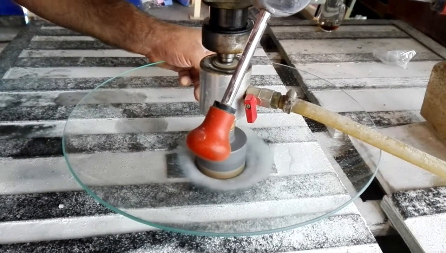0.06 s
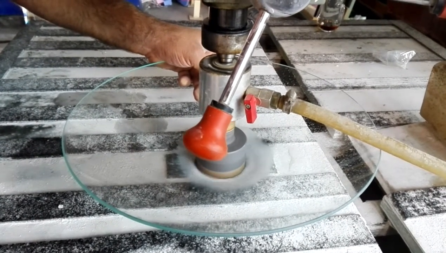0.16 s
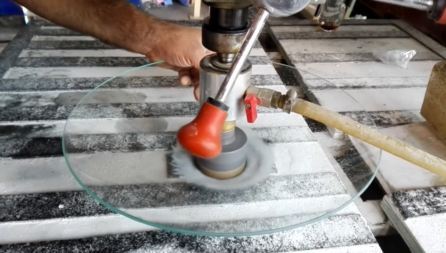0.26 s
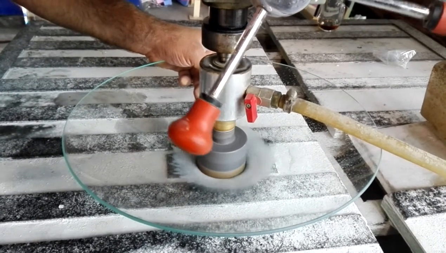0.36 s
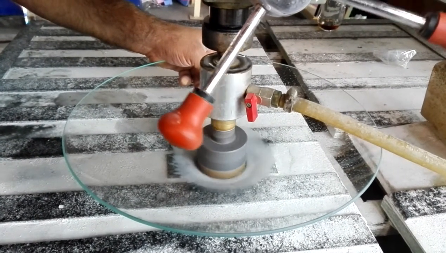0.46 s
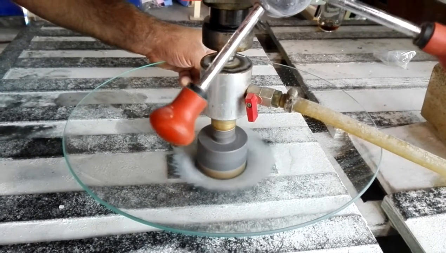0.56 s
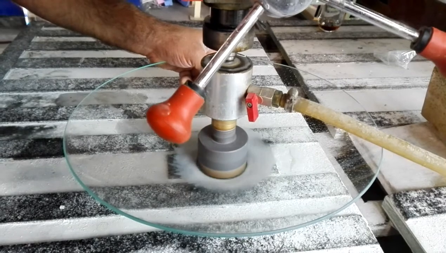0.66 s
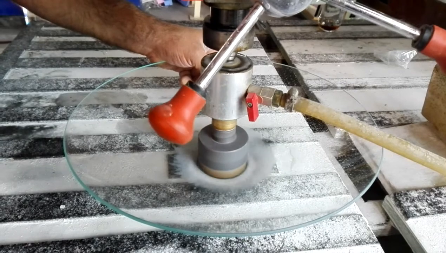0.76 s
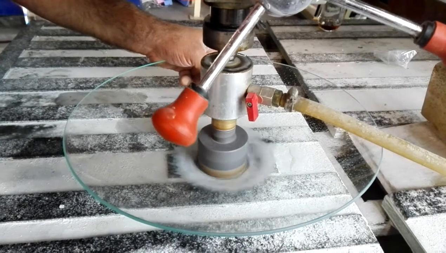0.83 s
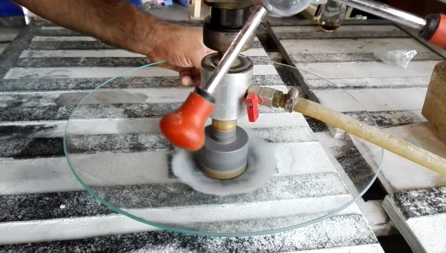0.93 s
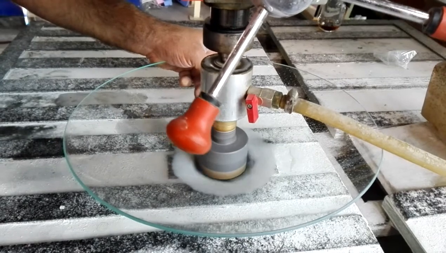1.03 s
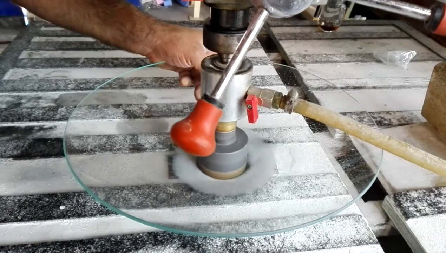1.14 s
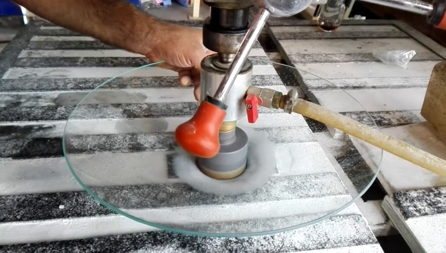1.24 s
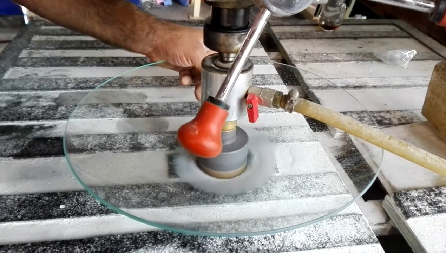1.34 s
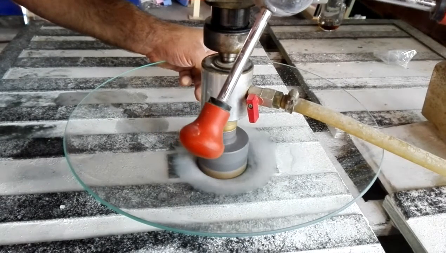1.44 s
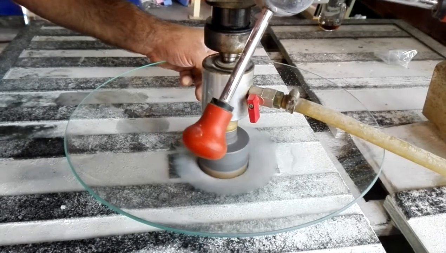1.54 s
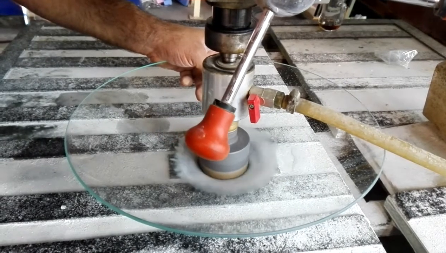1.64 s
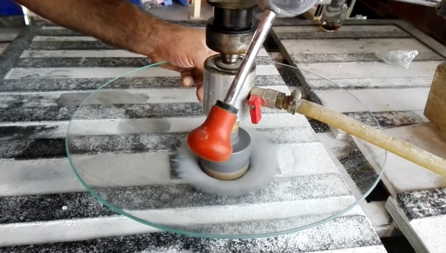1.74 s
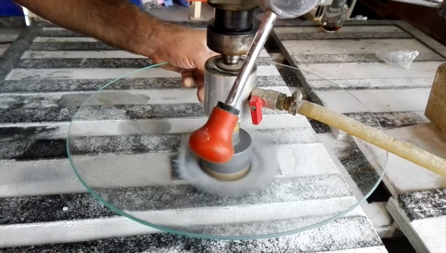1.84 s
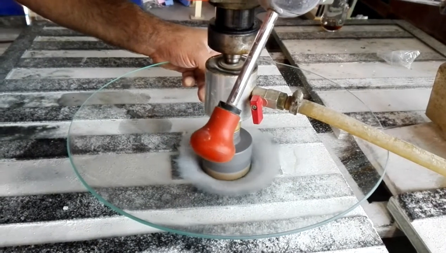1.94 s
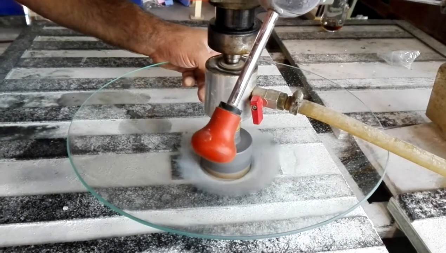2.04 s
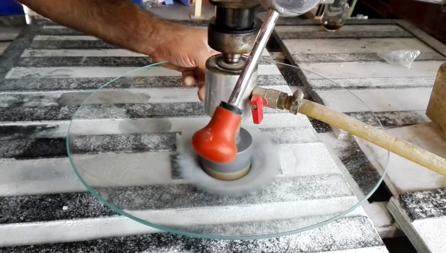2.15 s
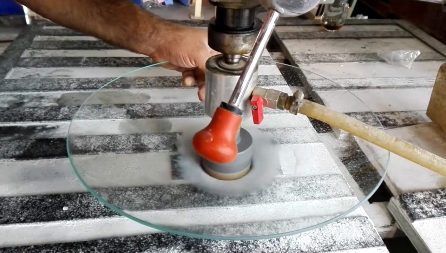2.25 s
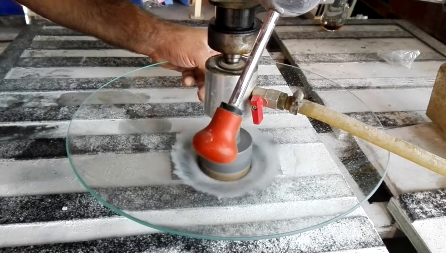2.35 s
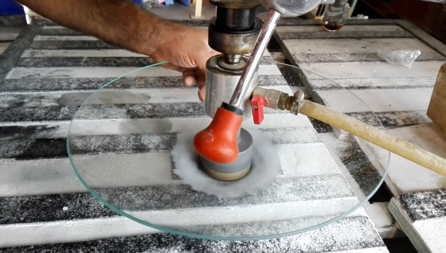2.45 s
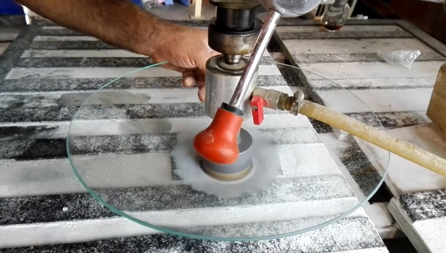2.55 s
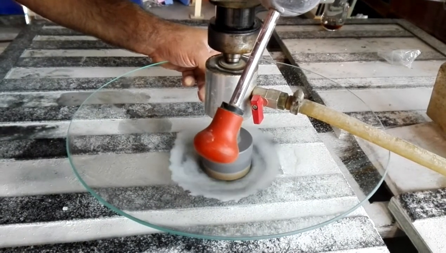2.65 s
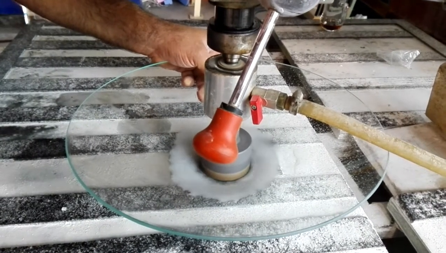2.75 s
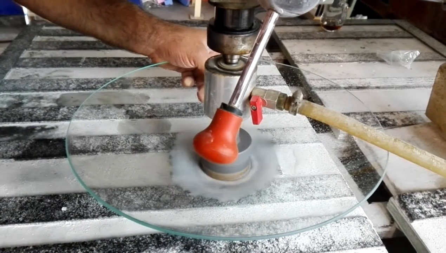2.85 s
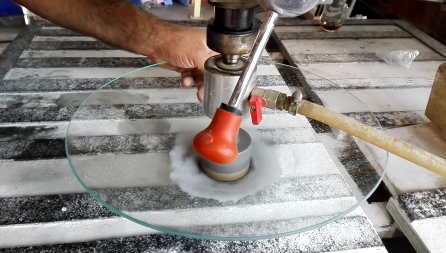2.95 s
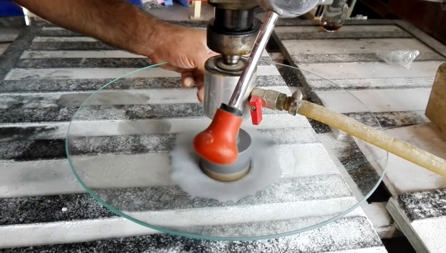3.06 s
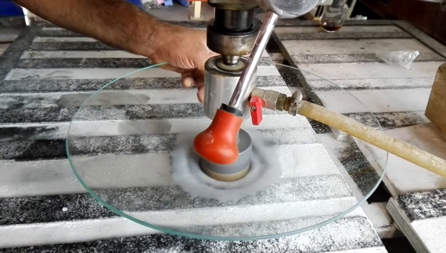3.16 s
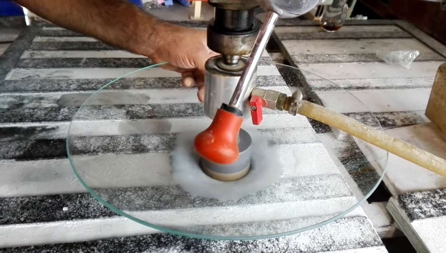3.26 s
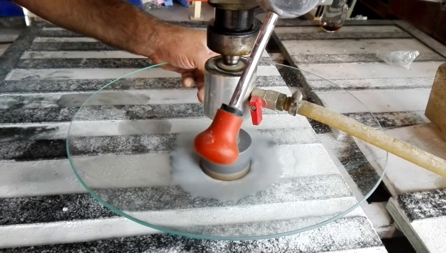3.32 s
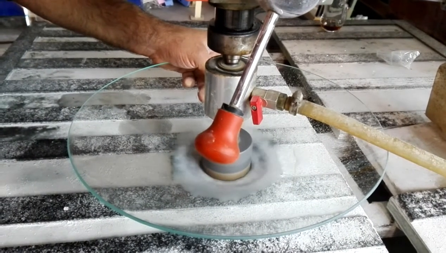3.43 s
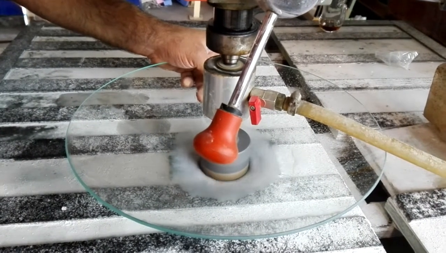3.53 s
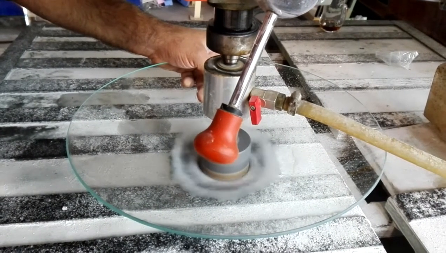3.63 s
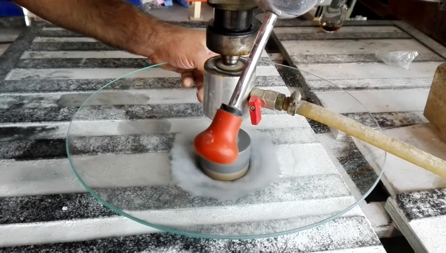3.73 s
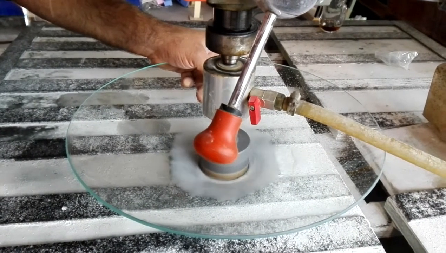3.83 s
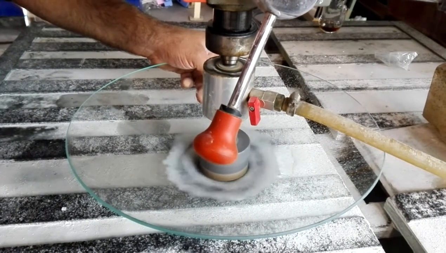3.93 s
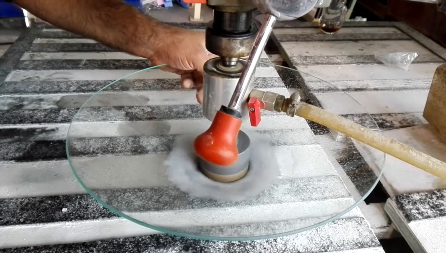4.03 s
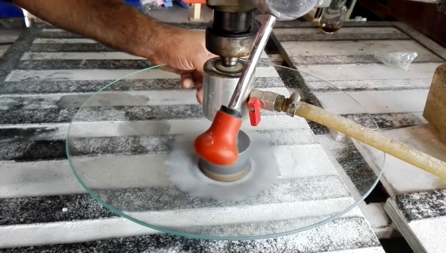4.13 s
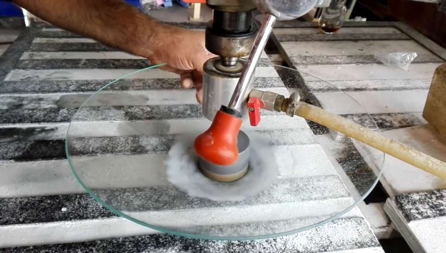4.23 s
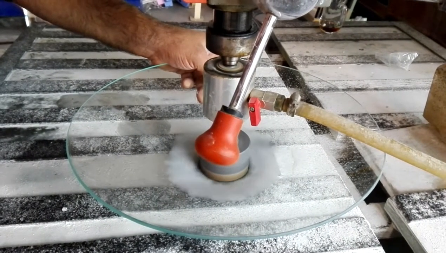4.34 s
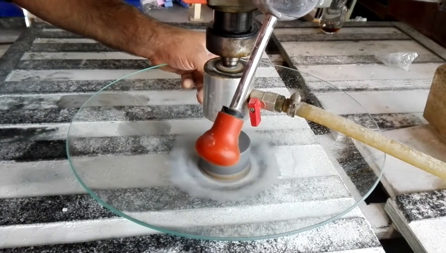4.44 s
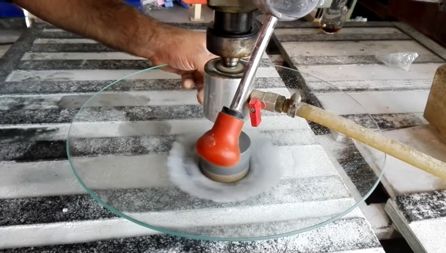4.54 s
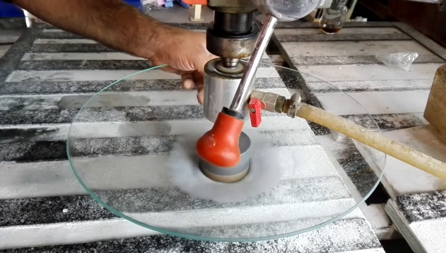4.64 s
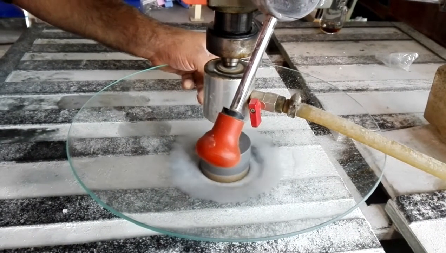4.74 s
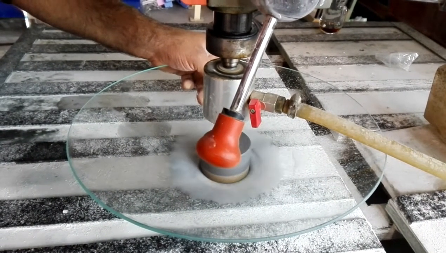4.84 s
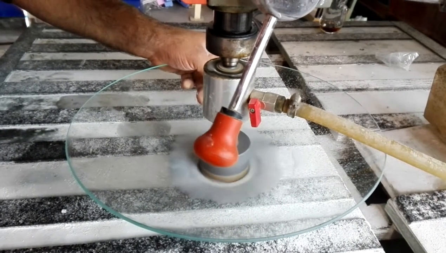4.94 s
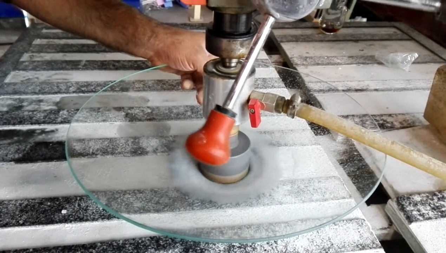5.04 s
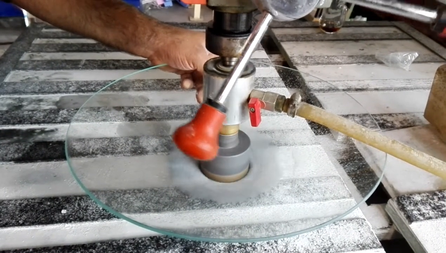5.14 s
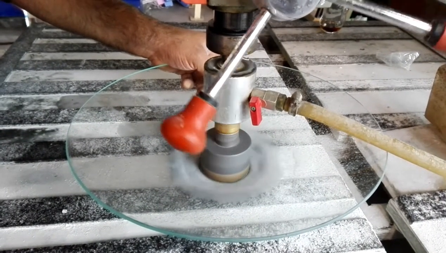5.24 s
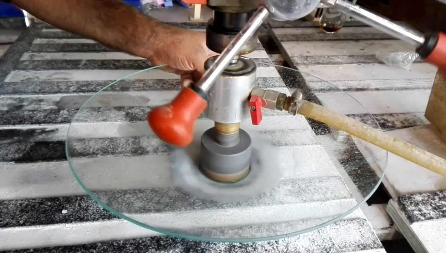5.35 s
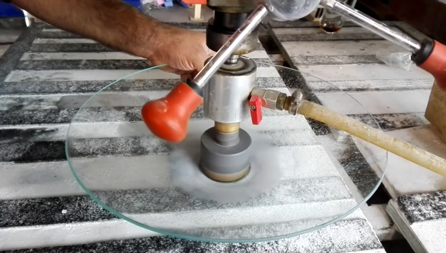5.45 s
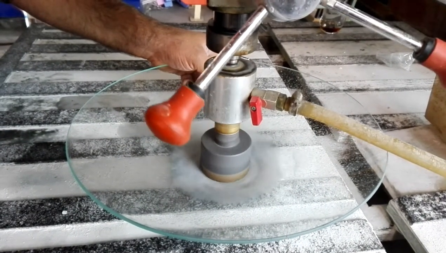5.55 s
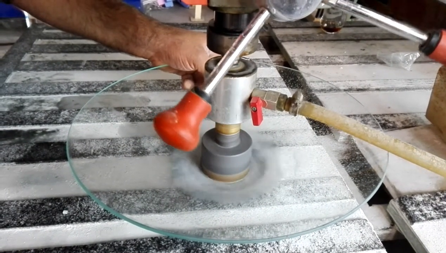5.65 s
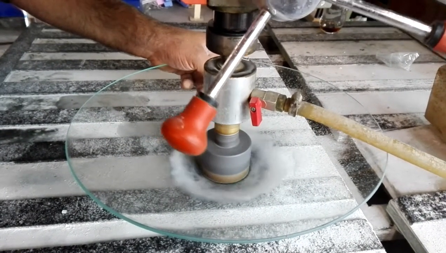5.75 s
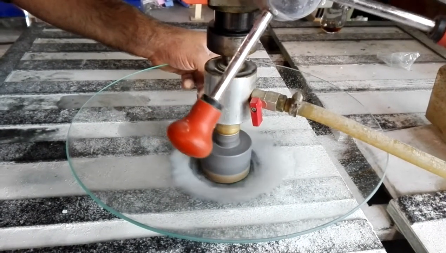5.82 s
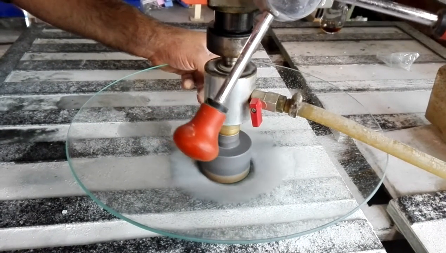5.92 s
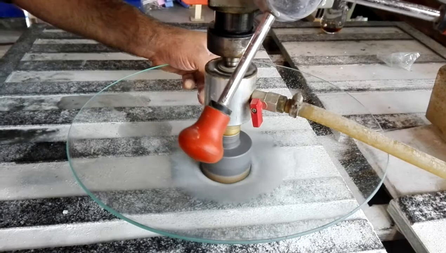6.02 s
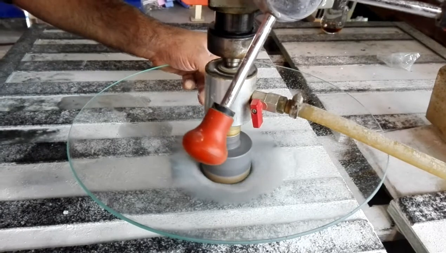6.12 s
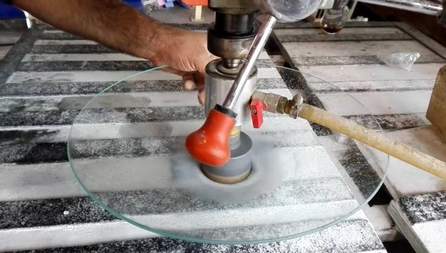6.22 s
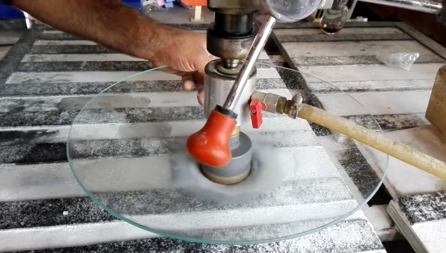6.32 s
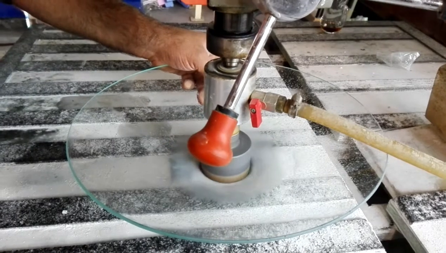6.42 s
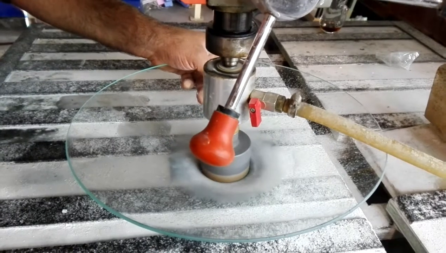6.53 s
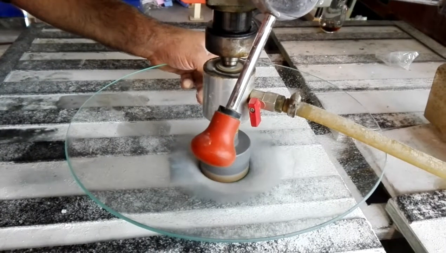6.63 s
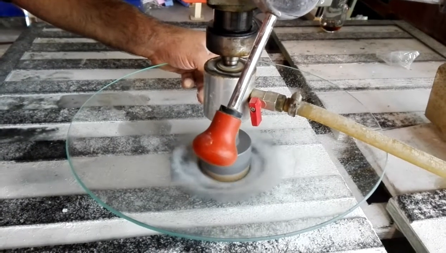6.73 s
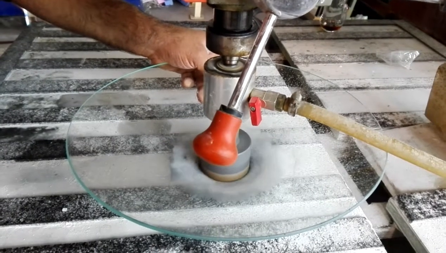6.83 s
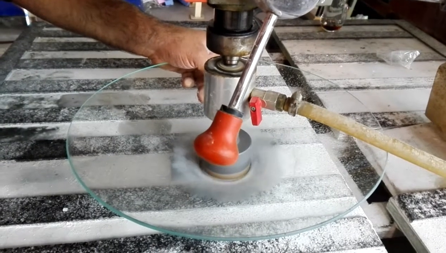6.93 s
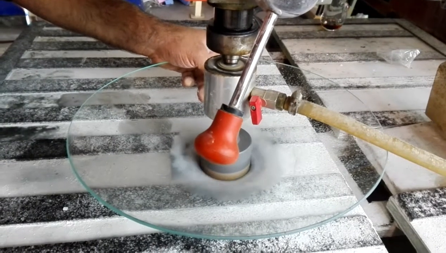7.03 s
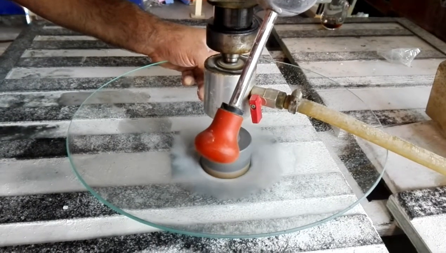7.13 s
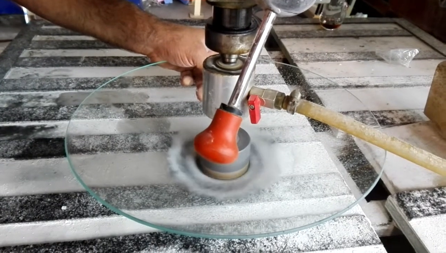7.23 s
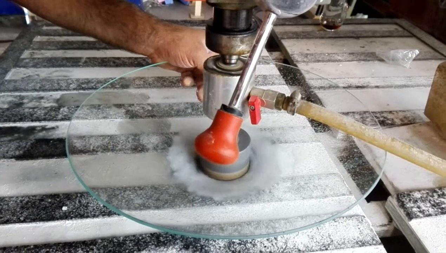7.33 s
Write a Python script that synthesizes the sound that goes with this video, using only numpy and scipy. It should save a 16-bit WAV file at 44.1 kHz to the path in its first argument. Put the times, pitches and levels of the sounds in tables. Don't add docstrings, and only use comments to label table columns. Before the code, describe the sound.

A drill motor and gears run constantly, a low rumble with a mid-high whirr, heard close on a phone in a lightly echoing workshop. At 0 s the bit is already squealing on glass; it stutters and lifts by 0.45 s, leaving motor, loose rattle and knocks at about 0.5 and 0.8 s. Scraping grazes at 0.97-1.05 s bring it down again. Gritty hiss and a rough squeal around 6 kHz set in, with groans at 1.3 and 1.65 s and a table hum building. From about 2.4 s a faint steady pump tone joins; from 2.5 to 5 s the screech is narrower and piercing, surging and throbbing rapidly, with a whistle swelling near 5 s. It lifts at 5.25 s, with a knock at 5.35 s. Broken rasps from 5.83 s become rougher, duller grinding after 6.2 s, continuing to the end.

```python
import sys
import numpy as np
from scipy import signal
from scipy.fft import irfft
from scipy.io import wavfile
from scipy.ndimage import uniform_filter1d

SR = 44100
rng = np.random.default_rng(int(sys.argv[2]) if len(sys.argv) > 2 else 0)


def pcm_store(signal):
    levels = np.round(np.clip(np.atleast_2d(signal), -1, 1) * 32767)
    wavfile.write(sys.argv[1], SR, levels.astype(np.int16).T)


def voltage_ratio(decibels):
    exponent = np.asarray(decibels, float) / 20
    return 10 ** exponent


N = 325443
T = np.arange(N) / SR

TURNS_PER_S, HIGH_SPOT_S = 42.35, 5.026
BRUSH_DB, BRUSH_HZ = -37.5, 5250

# pitch_hz, level_db (per Hz)
RUMBLE = [(21, -34), (36, 9), (70, -13), (103, -6.5), (130, -3), (286, -7.5), (347, -13), (421, -17),
          (548, -16), (665, -7), (727, -12), (766, -7.5), (1110, -10), (1250, -7.5), (2400, -12),
          (3120, -48), (5280, -120)]
# pitch_hz, level_db (per Hz)
WHIRR = [(1410, -15), (2400, -33), (2630, -10), (3100, -9.5), (3490, -1), (4000, -4), (4510, -4.5),
         (5900, -20), (8460, -12), (9610, -21), (11200, -21), (12600, -35), (14400, -34)]
# pitch_hz, width_hz, level_db
CASING = [(2650, 60, -17), (3730, 130, -2), (6350, 680, -15.5), (7760, 160, -12), (8500, 250, -8.5),
          (11050, 400, -12.5), (12600, 1300, -27), (14100, 500, -28)]
# pitch_hz, width_hz, level_db
HUM = [(43.5, 11, -61), (101.5, 16, -56.5), (148, 18, -66), (250, 30, -65.5)]
# pitch_hz, level_db
PUMP = [(324, -63), (375, -65)]
# pitch_hz, width_hz, level_db
SPINDLE = [(1247, 87, 2), (1390, 120, -0.5), (1520, 170, -5), (1720, 140, -4), (1950, 120, -6.5),
           (860, 180, -7)]
# start_s, peak_db
KNOCKS = [
    (0.5267, -31),
    (0.7653, -35),
    (0.944, -48),
    (5.3537, -26),
    (5.5199, -35),
]
# middle_s, half_length_s, extra_db
CHATTER = [(.33, .02, 10), (.45, .015, 4), (.535, .02, 8), (.665, .04, 6), (.775, .025, 6), (.955, .025, 7),
           (1.3, .2, 7), (1.75, .08, 9), (4.5, .5, -8), (5.33, .04, 7), (5.53, .05, 5), (5.66, .03, 4),
           (6.25, .1, 6), (6.65, .08, 6), (7.1, .08, 6)]
# pitch_hz, width_hz, level_db
TABLE = [(521, 95, -2), (600.5, 115, -0.5), (816, 187, 0.5), (940, 130, -3.5)]
# pitch_hz, width_hz, level_db
GLASS = [(1690, 115, -3.5), (1956, 200, -8.5)]
# peak_s, rise_s, fall_s (left out if same), extra_db
SWELLS = [(1.25, .1, 5), (2.45, .12, 3), (3.0, .2, 3.5), (3.4, .1, .3, 6), (4.2, .05, .15, 7),
          (4.45, .15, .1, 6), (4.68, .12, .1, 8), (4.97, .17, .055, 20), (6.33, .12, 3), (6.76, .05, 3),
          (7.38, .1, .1, 10)]
# middle_s, half_length_s, extra_db, pitch_hz
GROANS = [
    (1.3, .15, 16, 410),
    (1.65, .15, 19, 470),
    (5.07, .05, 18, 420),
    (6.42, .18, 18, 375),
]
# pitch_hz, level_db (per Hz)
GRIT = [(1410, -35), (2400, -46), (3060, -34.5), (3850, -10), (4760, -3), (6170, -6), (8560, -6.5),
        (9230, -0.5), (9890, -11.5), (11300, -3.5), (12100, -14.5), (14100, 0.5), (14800, -50.5)]
# pitch_hz, width_hz, level_db
BIT = [(3240, 89, -17), (3736, 58, -2.5), (4440, 50, -5), (6890, 100, -8), (7457, 140, -2),
       (7960, 130, -4.5), (9040, 380, -8), (9600, 80, -24), (10320, 115, -10), (11620, 240, -6),
       (12900, 400, -13.5), (13200, 150, -15.5)]
# pitch_hz, width_hz, level_db
UPPER_RIM = [(6920, 300, -2), (7553, 200, -1), (8150, 150, -5)]
# pitch_hz, width_hz, level_db
UPPER_OCTAVE = [(14100, 250, 0)]
# pitch_hz, width_hz, level_db
RIM = [(5230, 120, 7), (5460, 59, -4), (5740, 140, -2), (6030, 50, -8.5), (6264, 120, -1.5),
       (6420, 150, -1), (6600, 180, 0.5), (6990, 110, 0.5), (5870, 6300, 0)]
# pitch_hz, width_hz, level_db
OCTAVE = [(12590, 220, -1), (12800, 1900, -10), (13600, 120, -3)]
# touch_s, seated_s, easing_s, lift_s
CONTACTS = [
    (-6.0, -5.7, 0.33, 0.455),
    (0.995, 1.19, 5.08, 5.255),
    (5.83, 6.18, 7.6, 7.8),
]
# start_s, peak_db
GRAZES = [(0.417, -18.5), (0.4344, -19), (0.4683, -18.5), (0.9657, -17), (0.9904, -17.5), (1.001, -22),
          (1.0246, -15), (1.048, -15), (5.223, -18), (5.2435, -21), (5.8282, -12.5), (5.8565, -14),
          (5.8794, -30), (5.8964, -13), (5.915, -24), (5.984, -15), (6.0057, -36), (6.0306, -18),
          (6.0544, -19.5)]
# start_s, squeal_db, squeal_hz
FEED = [(0, -20, 6420), (.07, -15, 6400), (.19, -19, 6300), (.33, -27, 6000), (1.2, -26, 5980),
        (1.5, -29, 5880), (2.25, -29.5, 6330), (2.55, -20, 6620), (2.9, -19.5, 6450), (3.7, -20.5, 6300),
        (4.05, -19, 6420), (4.24, -25, 6180), (4.36, -19, 6480), (5.0, -19, 6300), (5.11, -24, 6050),
        (6.2, -25, 6100), (6.5, -30, 5850), (7.38, -27, 6350)]
# middle_s, half_length_s, extra_db, pitch_shift_hz
SURGES = [(.368, .012, 4, 0), (1.0, .02, -4, 0), (1.09, .025, 5, 0), (1.135, .01, 7, 0), (1.7, .1, 1.5, 0),
          (2.65, .05, 2.5, -60), (2.8, .06, 1.5, 60), (2.95, .05, 2, 40), (3.08, .06, 5, -40),
          (3.34, .05, 5, 70), (3.53, .09, 5.5, 110), (3.98, .05, 1.5, 0), (4.12, .07, 8, 0),
          (4.42, .07, 2, -40), (4.58, .08, 0, -110), (4.69, .06, 4.5, 50), (4.9, .08, 5, 0),
          (5.125, .015, -4, -150), (5.18, .04, 4, 0), (5.96, .03, 3.5, 0), (6.07, .03, 4, 0),
          (6.146, .008, 5, 0), (6.85, .08, -1, 120), (7.05, .06, -1.5, 0), (7.2, .08, 1.5, 60)]
SKIPS = [.358, .408, 1.012, 1.037, 1.152, 5.222, 5.234, 5.872, 5.935, 5.998, 6.022]
PATCH_EDGES_HZ = [4100, 4650, 5150, 5850, 6550, 7250, 7900, 8950, 10000, 11000, 12400, 13400, 14450]
PATCH_SHARE = [.05, .1, .22, .28, .32, .3, .27, .15, .2, .16, .08, .16]


def evened(x):
    return x / np.sqrt(np.mean(x ** 2) + 1e-20)


def colour(x, modes=(), slope=None, slope_db=0.):
    hz = np.fft.rfftfreq(4096, 1 / SR)
    power = sum(voltage_ratio(2 * db) / (1 + (2 * (hz - f) / w) ** 2) ** 1.29 for f, w, db in modes)
    if slope:
        f, db = np.transpose(slope)
        power = power + voltage_ratio(2 * (slope_db + np.interp(np.log(hz + 1), np.log(f), db)))
    taps = np.fft.fftshift(irfft(np.sqrt(power))) * np.hanning(4096)
    return evened(signal.oaconvolve(x, taps, "same"))


def resonate(x, hz, width):
    turn = np.exp(2j * np.pi * np.cumsum(hz) / SR)
    slow = signal.lfilter(*signal.butter(2, width / 2, fs=SR), x * turn.conj())
    return turn * slow / np.std(slow)


def hum_line(x, hz, width):
    b, a = signal.iirpeak(hz, hz / (1.5 * width), SR)
    return evened(signal.lfilter(b, a, signal.lfilter(b, a, x)))


def bumps(rows):
    out = np.zeros(N)
    for s, *lengths, height in rows:
        near = slice(max(int((s - 3 * lengths[0]) * SR), 0), int((s + 3 * lengths[-1]) * SR))
        u = T[near] - s
        out[near] += height * np.exp(-(u / np.where(u < 0, lengths[0], lengths[-1])) ** 2)
    return out


def once_a_turn(angle):
    return np.cos(2 * np.pi * TURNS_PER_S * (T - HIGH_SPOT_S) + angle)


def touching():
    contact = sum((T >= on) * (T <= off) * 1. for on, _, _, off in CONTACTS)
    return uniform_filter1d(contact, 130, mode="nearest")


def effort(contact_db, steady_db, graze_db):
    starts = np.zeros(N)
    for s, db in GRAZES:
        starts[round(s * SR) - 40] = voltage_ratio(db + graze_db)
    u = np.arange(1500) / SR
    grazes = signal.oaconvolve(starts, (1 - np.exp(-u / .0012)) * np.exp(-(u / .009) ** 2))[:N]
    return voltage_ratio(contact_db + steady_db) * touching() + grazes


def scratches(throb_db, patchy_db, flicker_db):
    frames = N // 64 + 6
    turns = (np.arange(frames) * 64 / SR - HIGH_SPOT_S) * TURNS_PER_S
    re, im, patches, flicker = rng.standard_normal((frames, 129, 4)).T
    angle = 2.26 * np.cumsum(uniform_filter1d(rng.standard_normal((4, 129)), 3, 1), 1)
    order = np.arange(1, 5)[:, None]
    pattern = (np.exp(1j * angle) / order ** 0.36).T
    throb = (pattern @ np.exp(2j * np.pi * order * turns)).real
    patches = evened(uniform_filter1d(uniform_filter1d(patches, 4, 0), 50, 1))
    flicker = evened(uniform_filter1d(uniform_filter1d(flicker, 60, 0), 14, 1))
    z = (re + 1j * im) * voltage_ratio(throb_db * throb + patchy_db * patches + flicker_db * flicker)
    return evened(signal.istft(z, nperseg=256, noverlap=192)[1][:N])


def workshop(x, t60):
    u = np.arange(SR // 2) / SR
    tail = rng.standard_normal(len(u)) * voltage_ratio(-60 * u / t60) * (u > .008)
    return signal.oaconvolve(x, tail / np.linalg.norm(tail))[:N]


def pump():
    tones = sum(voltage_ratio(db + 3) * np.sin(2 * np.pi * f * T) for f, db in PUMP)
    return np.clip((T - 2.35) / .1, 0, 1) * tones


def motor():
    churn = scratches(0.49, .8, 0.5)
    whirr = voltage_ratio(-43 - 3.5) * colour(churn, slope=RUMBLE)
    whirr = whirr + voltage_ratio(-45 - 0.2) * colour(churn, CASING, WHIRR, slope_db=-2.5)
    whirr = signal.sosfilt(signal.butter(4, 63., "high", fs=SR, output="sos"), whirr)
    return whirr + sum(voltage_ratio(db) * hum_line(churn, f, w) for f, w, db in HUM)


def spindle(squeal_db):
    play_db = -45.5 - .75 * touching() * (squeal_db - BRUSH_DB) + bumps(CHATTER)
    taps = voltage_ratio(4.0 * np.minimum(rng.exponential(1, N), 3))
    taps = taps * (rng.random(N) < 90 / SR) * rng.choice([-1, 1], N)
    rattle = voltage_ratio(play_db - 2.0) * colour(evened(taps) + 1.1 * rng.standard_normal(N), SPINDLE)
    u, blows = np.arange(3000) / SR, np.zeros(N)
    for s, db in KNOCKS:
        blows[round(s * SR)] = voltage_ratio(db - 3.0)
    ring = sum(voltage_ratio(db) * np.sin(2 * np.pi * f * u) * np.exp(-1.2 * w * u) for f, w, db in SPINDLE)
    ring = ring * (1 - np.exp(-u / 0.0016))
    return rattle + signal.oaconvolve(blows, ring)[:N]


def wall_whistle(shake, slack):
    loaded_db = -39.5
    wall_db = loaded_db - 13 * slack + bumps(SWELLS)
    steady = np.clip((wall_db + 43.5) / 19.0, 0, .7)
    hz = 4000 - 1.5 * (wall_db - loaded_db).clip(0)
    fuzz = resonate(shake, hz, 203.0).real
    waver = np.angle(resonate(rng.standard_normal(N), hz, 55.))
    pure = (1 + 0.29 * np.cos(2 * np.pi * TURNS_PER_S * T)) * np.cos(waver)
    return voltage_ratio(wall_db + 2.0) * (np.sqrt(1 - steady) * fuzz + np.sqrt(steady) * pure)


def load_rings(slack, sag_db):
    shake = scratches(3.6, 0.77, 0.87)
    wall = wall_whistle(shake, slack)
    thrum = colour(rng.standard_normal(N) + .3 * shake, TABLE)
    thrum = voltage_ratio(-41.3 - 28 * slack + sag_db - 1.5) * colour(thrum, TABLE)
    thrum = thrum * (1 + .42 * once_a_turn(-2.3))
    groan_hz = np.interp(T, *np.transpose(GROANS)[[0, 3]])
    groan_db = -72.5 + 3 + bumps([row[:3] for row in GROANS])
    groan = voltage_ratio(groan_db) * resonate(shake, groan_hz, 28).real
    hum = voltage_ratio(-41.5 - 7 * slack + .3 * sag_db - 2.5) * colour(shake, GLASS)
    return touching() * (wall + thrum + hum + groan)


def grinding(hiss_db, hz):
    grit = scratches(3.4, 1.31, 0.59)
    hiss = effort(hiss_db, steady_db=4.5, graze_db=-12.5) * colour(grit, BIT, GRIT, slope_db=-6.5)
    upper_db = np.maximum(-32 + 45 * (hz - 6300) / 1000, -52)
    upper = colour(grit, UPPER_RIM) + voltage_ratio(-14.5) * colour(grit, UPPER_OCTAVE)
    return hiss + touching() * voltage_ratio(upper_db - 4.0 + 3. * once_a_turn(1.5)) * upper


def bites(turns, hz):
    which = (np.floor(turns + 0.085) - np.floor(turns[0])).astype(int)
    strength_db, detune, start = rng.standard_normal((which.max() + 1, 3))[which].T
    u = np.maximum((turns + .1) % 1 - .04, 0) / .075
    phase = 2 * np.pi * np.cumsum(hz - 175. + 31.0 * detune) / SR + 2 * start
    return 2.5 * voltage_ratio(1.5 * strength_db) * u * np.exp(1 - u) * np.cos(phase)


def squeal(db, hz):
    turns = (T - HIGH_SPOT_S) * TURNS_PER_S
    swept = hz + uniform_filter1d(320. * (turns % 1 - .4), 120)
    narrow = resonate(rng.standard_normal(N), swept, 260.0)
    narrow = narrow / (abs(narrow) + .2) ** .2
    pressure = np.clip((db + 31.) / 14.6, 0, .9)
    brushing = np.clip((5750 - hz) / 350.0, 0, .8)
    grit = scratches(2.4, 1.4, .7)
    broad = np.sqrt(brushing) * resonate(grit, swept, 1100.)
    broad = broad + np.sqrt(1 - brushing) * resonate(grit, swept, 1700.)
    tone = np.sqrt(pressure) * narrow + np.sqrt(1 - pressure) * broad
    throb = voltage_ratio(2.7 * np.cos(4 * np.pi * turns + 2.) + 1.27 * np.cos(8 * np.pi * turns))
    body = throb * colour(tone.real, RIM)
    rim = effort(db, steady_db=-1.0, graze_db=-15.5) * (body + pressure * bites(turns, hz))
    doubled = (narrow ** 2 / (abs(narrow) + 0.36) ** 1.0).real
    octave = colour(doubled + .2 * rng.standard_normal(N), OCTAVE)
    octave_db = np.maximum(-35.5 + 1.7 * (db + 19), -49)
    return rim + touching() * voltage_ratio(octave_db) * octave


def pressing():
    seat_s, load_s = .11, .9
    seat = sum(np.clip(np.minimum(T - sunk, ease - T) / seat_s + 1, 0, 1) for _, sunk, ease, _ in CONTACTS)
    load = sum(np.clip(np.minimum((T - on) / load_s, .75 * (off - T) / (off - ease)), 0, 1)
               for on, _, ease, off in CONTACTS)
    sag_db = -.9 * sum((T - on - load_s).clip(0) * (T < off) for on, _, _, off in CONTACTS)
    s, db, hz = np.transpose(FEED)
    grabs = [(middle, half, extra) for middle, half, extra, _ in SURGES]
    grab_db = bumps(grabs + [(skip, .006, -8) for skip in SKIPS])
    shift_hz = bumps([(middle, half, up) for middle, half, _, up in SURGES])
    squeal_db = BRUSH_DB + seat * (np.interp(T, s, db) - BRUSH_DB) + grab_db
    squeal_hz = BRUSH_HZ + seat * (np.interp(T, s, hz) - BRUSH_HZ) + shift_hz
    brush_hiss_db = -43.5
    seated_db = -34.5 + 5 * np.minimum(squeal_hz - 6300, 0) / 1000
    hiss_db = brush_hiss_db + seat * (seated_db - brush_hiss_db) + .7 * (1 - seat) * grab_db
    return squeal_db, squeal_hz, hiss_db, (1 - load) ** 2, sag_db


def scene():
    squeal_db, hz, hiss_db, slack, sag_db = pressing()
    cut = grinding(hiss_db, hz) + squeal(squeal_db, hz) + load_rings(slack, sag_db)
    machine = motor() + pump() + spindle(squeal_db)
    return np.tile(cut + voltage_ratio(-19.0) * workshop(cut, t60=0.7) + machine, (2, 1))


def soft_limit(x):
    crest = np.sqrt(abs(2 * uniform_filter1d(uniform_filter1d(x ** 2, 22), 22)))
    return x / (1 + (crest / .76) ** 4) ** .25


def noise_patches(x):
    hz, t, z = signal.stft(x, SR, nperseg=512, noverlap=256)
    z = z * (hz < 14400)[:, None]
    band, block = np.digitize(hz, PATCH_EDGES_HZ), np.arange(len(t)) // 4
    power = uniform_filter1d(uniform_filter1d(abs(z) ** 2, 3, 0), 4, 1) + 1e-20
    loudest = np.array([power[band == k].max(0)[::4] for k in range(band.max() + 1)])
    draw = rng.random(loudest.shape)
    odd = draw[:, 1::2]
    before = draw[:, :-1:2][:, :draw.shape[1] // 2]
    draw[:, 1::2] = np.where(rng.random(odd.shape) < .7, before, odd)
    swap = (draw < np.r_[0, PATCH_SHARE, 0][:, None]) * (loudest < voltage_ratio(2 * -40))
    noise = signal.stft(rng.standard_normal((2, N)), SR, nperseg=512, noverlap=256)[2]
    z = np.where(swap[band][:, block], voltage_ratio(0.5) * np.sqrt(power) * noise / np.std(noise), z)
    return signal.istft(z, SR, nperseg=512, noverlap=256)[1][:, :N]


def low_pass(x):
    return signal.sosfilt(signal.butter(12, 14980, fs=SR, output="sos"), x)


def record(dry):
    heard = noise_patches(soft_limit(dry[0]))
    return low_pass(heard)


dry = scene()
out = record(dry)
pcm_store(out)
```